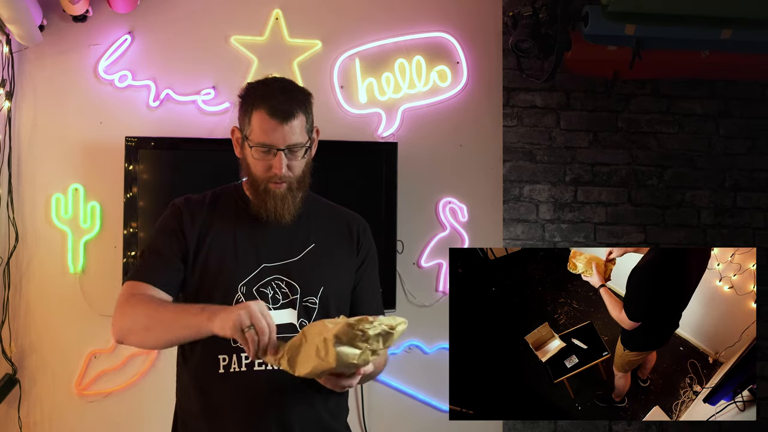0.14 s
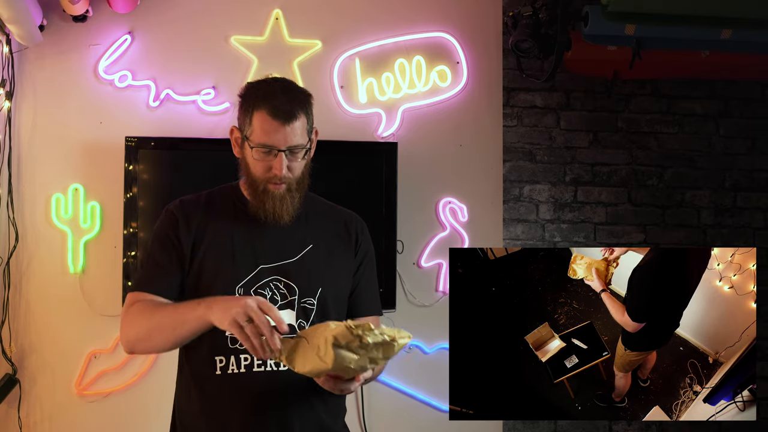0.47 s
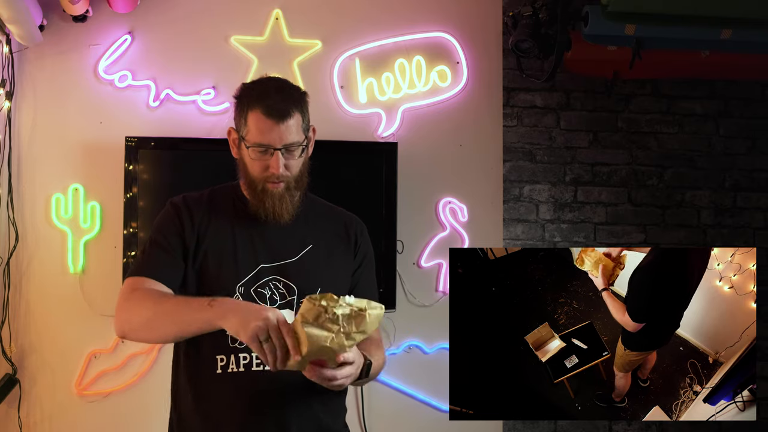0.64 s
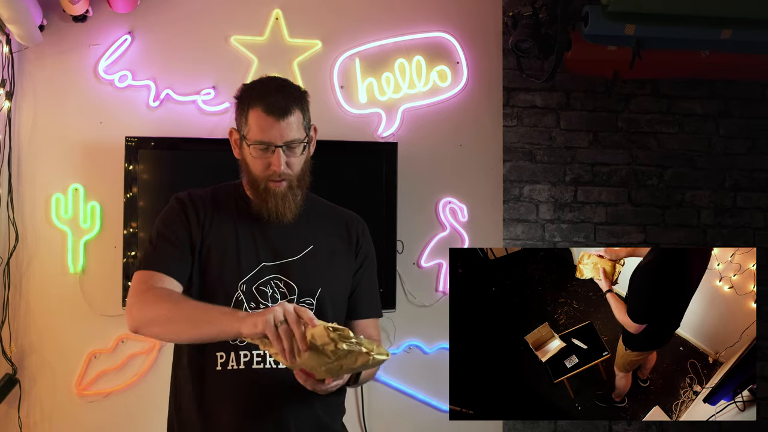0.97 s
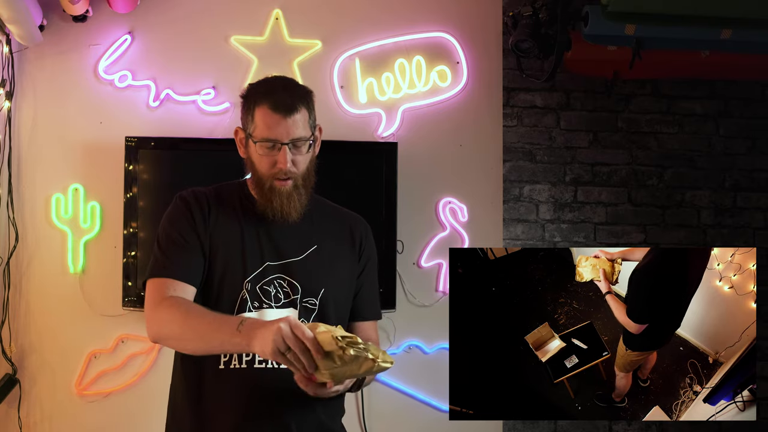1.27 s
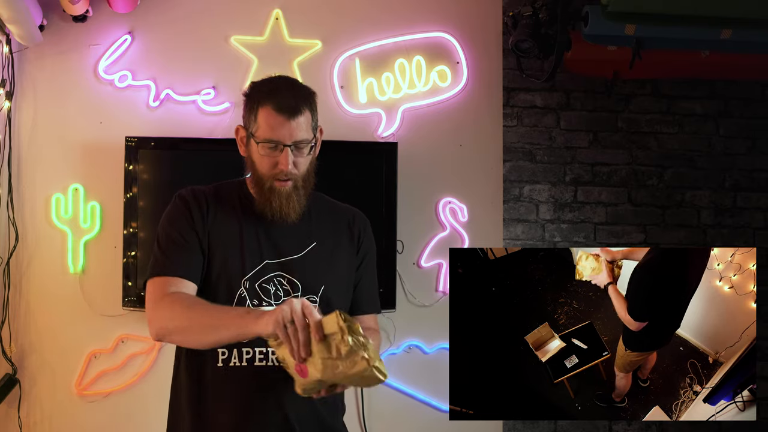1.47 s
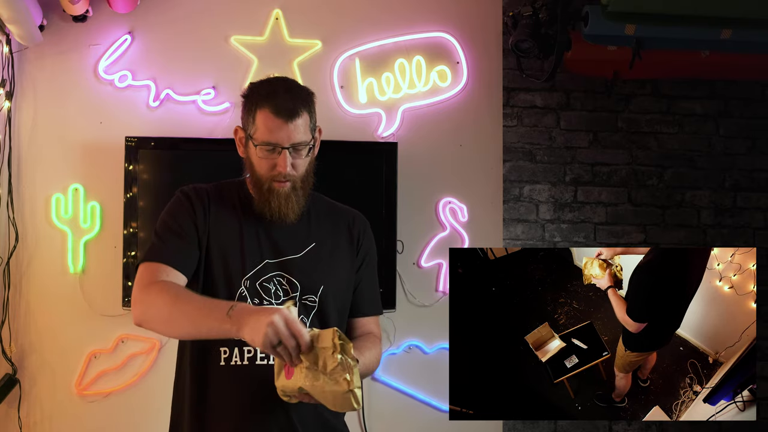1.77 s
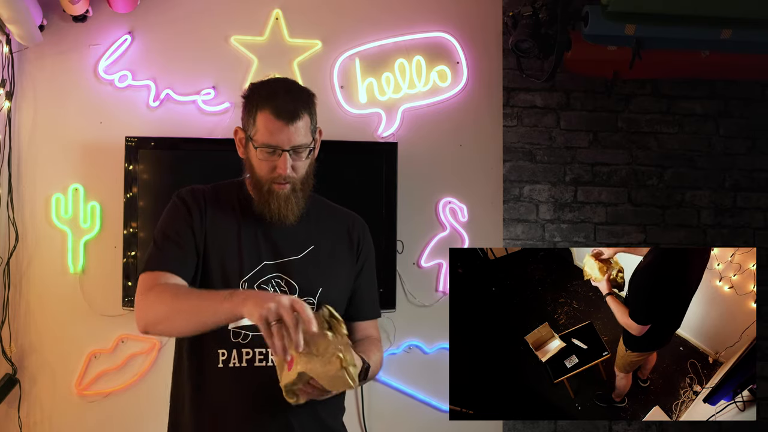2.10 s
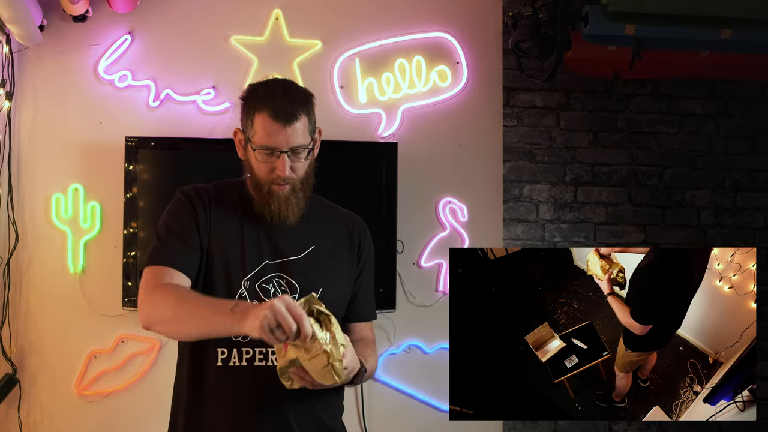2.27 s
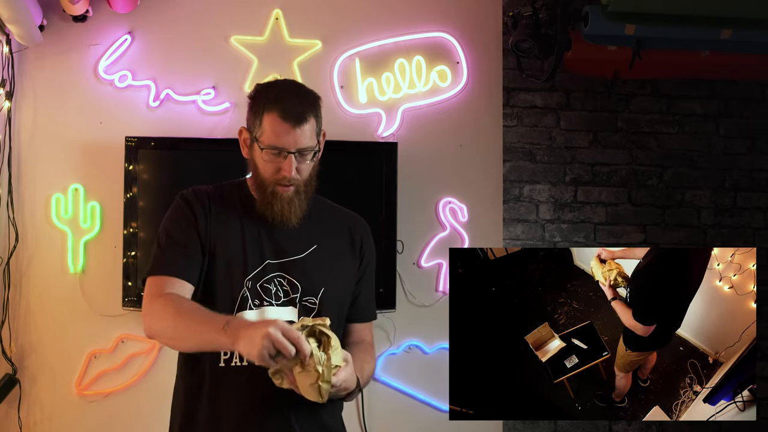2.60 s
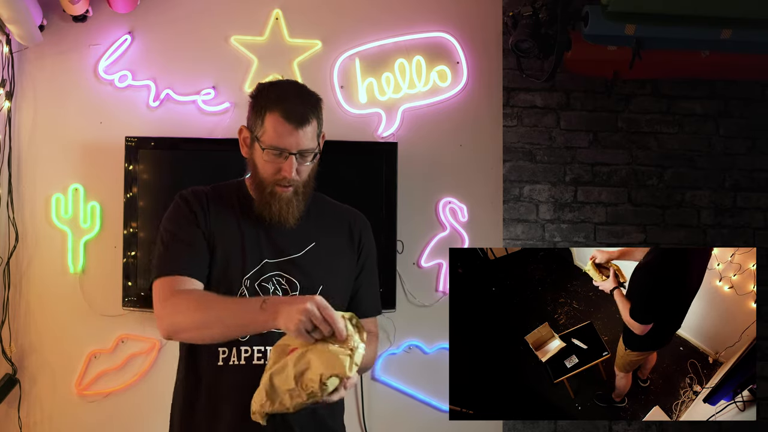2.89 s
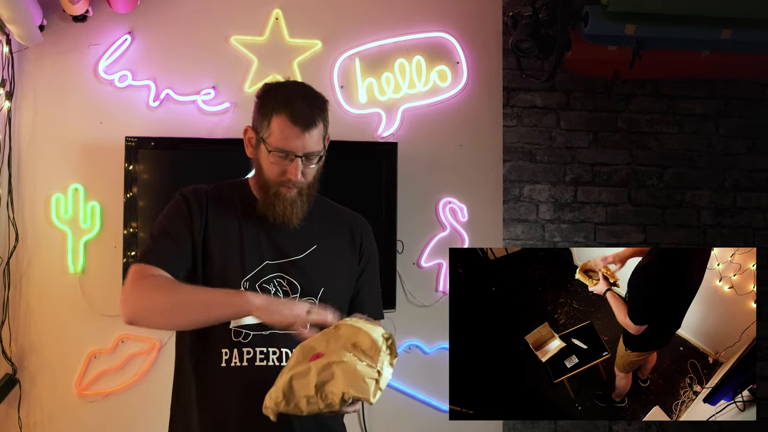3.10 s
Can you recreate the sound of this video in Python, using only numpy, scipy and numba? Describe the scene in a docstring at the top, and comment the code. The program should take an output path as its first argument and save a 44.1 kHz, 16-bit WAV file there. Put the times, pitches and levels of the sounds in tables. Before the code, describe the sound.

Stiff wrapping paper crumpled and pulled open by hand, sharp crackles and snaps in a small room

```python
"""Stiff wrapping paper is pulled open and crumpled by hand a metre from a microphone in a small room.
Crackle opens the scene; folds and snaps burst hard at about 0.25 s and keep coming until a lull near 1.3 s.
The loudest fold bursts at 1.7 s with a soft thump; folds go on to the end, the last ones further apart.
Every buckling crease is a short damped sine, large facets low and small creases high; folds are dense
clusters of them, snaps are brief noise, and rumble and faint hiss lie beneath. The peaks overload."""
import sys
import numpy as np
from scipy import signal
from scipy.fft import rfft, irfft
from scipy.io import wavfile
from scipy.ndimage import uniform_filter1d, map_coordinates
from numba import njit

SR = 44100
rng = np.random.default_rng(int(sys.argv[2]) if len(sys.argv) > 2 else 0)


def dump(signal):
    """Clip the signal to [-1, 1] and save it as 16-bit WAV at the path in sys.argv[1]."""
    limited = np.clip(np.atleast_2d(signal).T, -1, 1)
    pcm = np.round(limited * 32767).astype(np.int16)
    wavfile.write(sys.argv[1], SR, pcm)


def level_to_linear(level):
    """Convert decibel levels to linear amplitude factors, elementwise."""
    exponent = np.asarray(level, float) / 20
    return 10 ** exponent


N = 143325  # samples, 3.25 s


def unit(x):
    """Scale to rms 1."""
    return x / np.sqrt(np.mean(x ** 2))


def over_hz(table, hz):
    """Read a table of (Hz, value) along log frequency."""
    table = np.array(table, float)
    return np.interp(np.log(np.maximum(hz, 1)), np.log(table[:, 0]), table[:, 1])


def band(x, lo_hz, hi_hz):
    """Band-pass with gentle edges."""
    return signal.sosfilt(signal.butter(2, [lo_hz, hi_hz], "bandpass", fs=SR, output="sos"), x)


def walk(rate):
    """Random levels, each held for 1 / rate seconds, with the steps smoothed into slopes."""
    hold = int(SR / rate)
    held = rng.standard_normal(N // 50)[np.arange(N) // hold]
    return uniform_filter1d(held, hold // 2)


@njit
def rings(n, start, pole, size, length):
    """Adds up short damped sines, each a rotating and shrinking complex number."""
    y = np.zeros(n)
    for g in range(len(start)):
        z = size[g] + 0j
        for i in range(start[g], min(n, start[g] + length[g])):
            y[i] += z.imag
            z *= pole[g]
    return y


def damped_sines(start_s, hz, cycles, size):
    """Struck resonances: each amplitude falls by a factor e in half the given number of cycles."""
    tau = cycles / 2 / hz * SR  # samples
    pole = np.exp(2j * np.pi * hz / SR - 1 / tau)
    return rings(N, (start_s * SR).astype(np.int64), pole, size, (6 * tau).astype(np.int64))


def background():
    """Low rumble that comes and goes, and faint steady hiss, both filtered noise."""
    # Rumble under the paper: start_s [s], level_db [dB rms]
    rumble_levels = [(0.0, -63), (0.44, -70), (0.5, -51), (0.78, -63), (1.28, -70), (1.55, -62), (2.6, -70),
                     (3.1, -56)]
    time_s, level_db = np.array(rumble_levels).T
    rumble = unit(band(band(rng.standard_normal(N), 6, 77), 6.9, 97))
    rumble = rumble * level_to_linear(np.interp(np.arange(N) / SR, time_s, level_db))
    hiss = unit(band(rng.standard_normal(N), 100, 4500))
    return rumble + level_to_linear(-52.5) * hiss


def room(x):
    """Diffuse echo that dies fastest near 1 kHz; its fine pattern changes as the parcel moves."""
    # Decay of the small room: pitch_hz [Hz], t60_s [s]
    room_decay = [(200, 0.34), (1000, 0.17), (4000, 0.26), (12000, 0.43)]
    echo_db, gap_s = -8, 0.0047  # echo energy against the direct sound; silence ahead of the echo
    places = 8  # positions of the parcel, each with its own echo pattern
    t = np.arange(SR // 2) / SR
    onset = np.clip(t / gap_s - 1, 0, 1)
    wet = 0
    for place in range(places):
        echo = 0
        for hz in 125 * 2. ** np.arange(7):  # octave bands
            t60 = over_hz(room_decay, hz)
            tail = band(rng.standard_normal(len(t)), hz / np.sqrt(2), hz * np.sqrt(2))
            echo = echo + tail * level_to_linear(-60 * t / t60) * onset / np.sqrt(t60)
        echo = echo / np.sqrt(np.sum(echo ** 2))
        # each place fades into the next at constant power
        distance = np.abs(np.arange(N) / N * (places - 1) - place)
        share = np.sqrt(np.clip(1 - distance, 0, 1))
        wet = wet + signal.fftconvolve(x * share, echo)[:N]
    return x + level_to_linear(echo_db) * wet


def thumps():
    """Low damped swings when the parcel is pushed in."""
    # Soft thumps of the whole parcel: start_s [s], level_db [dB at onset, before the band-pass], pitch_hz [Hz]
    thump_events = [(1.697, -22, 168), (1.89, -28, 159), (2.216, -28, 187), (2.469, -21.5, 169),
                    (2.511, -30, 197), (2.809, -27.5, 210)]
    start_s, level_db, hz = np.array(thump_events).T
    return band(damped_sines(start_s, hz, 6.2, level_to_linear(level_db)), 76, 450)


def snaps():
    """Single sharp creases: a few ms of noise around one pitch, with a broad bright edge."""
    # Crisp snaps: start_s [s], level_db [dB rms before decay, 10 dB above what is used], centre_hz [Hz]
    snap_events = [(0.158, -20, 2870), (0.2493, 8, 3630), (0.261, 0, 4270), (0.276, 5, 2550),
                   (0.288, 10, 1440), (0.303, -6, 2430), (0.608, -10, 900), (0.6817, -4.5, 2620),
                   (0.7263, -10, 3550), (0.7922, -10, 3600), (0.857, -11, 2850), (0.9528, -7.5, 3580),
                   (0.986, -6, 1700), (1.008, -3.5, 630), (1.0597, 0, 3700), (1.06, 1.5, 610),
                   (1.1141, 0.5, 1560), (1.213, -0.5, 607), (1.2121, 0.5, 1780), (1.236, 7.5, 4470),
                   (1.2375, -2.5, 900), (1.264, 0, 1940), (1.385, -7, 2780), (1.563, -6, 2670),
                   (1.6934, -16, 2620), (1.8164, -1, 2870), (1.8264, -7, 2620), (1.8367, -8, 2600),
                   (1.851, 4, 2930), (1.87, -4, 3180), (1.95, -6, 3240), (2.111, -17, 1090),
                   (2.2256, -4.5, 2500), (2.2364, 1.5, 2340), (2.3135, -9, 2900), (2.328, -13, 9000),
                   (2.384, -21, 7300), (2.491, -19, 10500), (2.503, -20, 10500), (2.525, -7, 1770),
                   (2.579, -13, 4400), (2.642, -23, 8850), (2.714, -12, 1550), (2.807, -4.5, 2580),
                   (2.839, -10, 3570), (2.9049, -1, 3400), (2.975, -10, 3220), (3.047, -19.5, 10500),
                   (3.2394, -6, 3140)]
    trim_db, t60_s, edge_db = -10, 0.023, -8.5
    spread = 1.43  # the band runs from centre / spread to centre * spread
    out = np.zeros(N + 2048)
    age = np.arange(2048) / SR
    jolt = 1.54 * (age < 2 / SR)  # a first kick over the crackle
    for (start_s, level_db, hz), noise in zip(snap_events, rng.standard_normal((80, 2048))):
        noise = noise + jolt
        crackle = unit(band(noise, hz / spread, min(hz * spread, 18000)))
        edge = band(band(noise, 2200, 11700), 1500, 13600)
        edge = edge * min(hz / 3040, 1) ** 2  # duller snaps have less edge
        snap = crackle + level_to_linear(edge_db) * edge
        i = int(start_s * SR)
        out[i:i + len(age)] += snap * level_to_linear(level_db + trim_db - 60 * age / t60_s)
    return out[:N]


def hollow(x):
    """The parcel's air and folds favour a few pitches: resonators run alongside the direct sound."""
    # Resonances of the parcel: pitch_hz [Hz], width_hz [Hz], level_db [dB, before the common trim below]
    resonances = [(567, 79, 4.5), (1745, 41, 8.5)]
    ringing = sum(level_to_linear(db) * signal.lfilter(*signal.iirpeak(hz, hz / width_hz, fs=SR), x)
                  for hz, width_hz, db in resonances)
    return x + level_to_linear(-12.5) * ringing


def paper_colour(x):
    """Causal minimum-phase filter with the tone of the paper, built from its log gain."""
    # Tone of the paper: pitch_hz [Hz], gain_db [dB]
    paper_tone = [(65, -73), (110, -22), (160, -16.5), (262, -1), (323, -8), (601, -1), (666, -1), (987, 0),
                  (1140, -3.5), (1690, 0), (2170, -2), (2560, 0.5), (5600, -10), (7500, -18), (15500, -25)]
    log_gain = over_hz(paper_tone, np.linspace(0, SR / 2, 1025)) * np.log(10) / 20
    cepstrum = irfft(log_gain)
    # folding the cepstrum onto positive time makes the filter causal
    cepstrum[1:1024] *= 2
    cepstrum[1025:] = 0
    return signal.fftconvolve(x, irfft(np.exp(rfft(cepstrum))))[:N]


def creases(lo_hz, hi_hz, per_s, cycles, scatter_db):
    """A stream of buckling creases, damped sines of random pitch and heavy-tailed size; rms 1."""
    biggest_db = 10.5  # ceiling of the size scatter
    patch_db, patch_s, patch_oct = 3.5, 0.025, 0.593
    when, pitch, rarity, sign = rng.random((150000, 4))[:int(per_s * N / SR)].T
    start_s = when * N / SR
    hz = lo_hz * (hi_hz / lo_hz) ** pitch
    scatter = np.minimum(-scatter_db * np.log(1 - rarity), biggest_db)
    size = hz * level_to_linear(scatter) * np.sign(sign - 0.5)
    # the colour shifts in patches of time and pitch as other facets take the strain
    patch = map_coordinates(rng.standard_normal((400, 12)),
                            [start_s / patch_s, np.log2(hz / lo_hz) / patch_oct],
                            order=1, mode="mirror")
    size = size * level_to_linear(patch_db * patch)
    y = damped_sines(start_s, hz, cycles, size)
    return unit(band(paper_colour(y), lo_hz, hi_hz))


def fold_power(start_s, level_db, t60_s):
    """Power envelope of sudden folds, each starting within about 1 ms and dying away."""
    t = np.arange(N) / SR
    power = np.zeros(N)
    for start, db, t60 in zip(start_s, level_db, t60_s):
        i = int(start * SR)
        age = t[:min(N - i, int(t60 * SR))]
        attack = 1 - np.exp(-age / 0.001)
        power[i:i + len(age)] += (level_to_linear(db - 60 * age / t60) * attack) ** 2
    return power


def paper():
    """Steady crumpling, plus folds that each release a cluster of creases, plus lone tiny ticks."""
    # Creases, large facets to fine: lowest_hz [Hz], highest_hz [Hz], rate [per s, while crumpling],
    # cycles [twice the cycles to fall by e], scatter_db [dB, mean before the ceiling, while crumpling]
    crease_sizes = [(110.4, 920, 1300, 3.35, 2.5), (758, 4560, 7000, 2.67, 4.5),
                    (3700, 20000, 15000, 0.88, 0.5)]
    # Crumpling by hand: start_s [s], middle_db [dB], large_db and fine_db [dB above middle]
    crumpling = [(0.0, -30.5, -14.5, -2), (0.08, -43, -0.5, -9), (0.1, -35.5, -18, -6),
                 (0.182, -22, -9.5, -10), (0.232, -28, -10, -5), (0.26, -12.5, -11, -4.5),
                 (0.304, -7, -6.5, -7), (0.33, -16.5, -7.5, -16), (0.44, -36.5, -12.5, -20),
                 (0.48, -33.5, -12, -2.5), (0.56, -48.5, -10.5, -2.5), (0.61, -29.5, 3.5, -7.5),
                 (0.67, -32.5, -8.5, -3), (0.689, -19.5, -9.5, -10), (0.71, -26.5, -11, -16),
                 (0.78, -32, -15, -4.5), (0.799, -18.5, -13.5, -14), (0.9, -30, -8, -3.5),
                 (0.97, -26.5, -11.5, -14), (1.02, -22, -6, -9.5), (1.06, -24, -7, -7), (1.09, -34, -9, -6),
                 (1.12, -24, -5, -11), (1.14, -28.5, -1, -7.5), (1.201, -31, -4, -7),
                 (1.211, -21, -7.5, -7), (1.27, -24.5, -8.5, -1), (1.539, -42, -3.5, -12.5),
                 (1.568, -15.5, -5.5, -12), (1.6, -26, -0.5, -8), (1.69, -24, -7.5, -7),
                 (1.701, -8, -5, 0.5), (1.709, -13.5, 2, -1), (1.81, -31.5, -5, -6.5),
                 (1.83, -16, -8.5, -4), (1.87, -18, -2.5, 0), (1.97, -17.5, -12, -10.5),
                 (2.05, -34.5, -0.5, -13), (2.07, -28.5, -0.5, -6.5), (2.222, -34.5, -9.5, -6),
                 (2.241, -19.5, -7.5, -7.5), (2.3, -25.5, -9.5, -4), (2.34, -19, -3.5, -13),
                 (2.44, -29, -10.5, -4), (2.48, -25.5, 3.5, -6), (2.59, -25.5, -6.5, -13),
                 (2.62, -31.5, -7, -9), (2.7, -34.5, -10, -7), (2.71, -28.5, 1, -11),
                 (2.74, -24.5, -7.5, -5.5), (3.04, -30, -6.5, -7), (3.13, -44, -1, -8),
                 (3.25, -28, -5.5, -11)]
    # Sudden folds: start_s [s], middle_db, large_db, fine_db [dB before the common trim],
    # t60_s [s, before the factor for each crease size]
    folds = [(0.099, -7.5, -48, -39, 0.049), (0.118, -16.5, -23, -13.5, 0.052),
             (0.177, -24, -44, -8, 0.046), (0.249, -1, -6.5, -11, 0.033), (0.469, -25, -45, -5, 0.036),
             (0.587, -12.5, -22, -17, 0.054), (0.61, -14, -42, -20, 0.033),
             (0.639, -11.5, -46, -11.5, 0.07), (0.682, -8, -35, -10, 0.041), (0.794, -11, -39, -16, 0.098),
             (0.856, -6, -18, -8.5, 0.066), (0.922, -8, -43, -13, 0.038), (0.951, -6.5, -27, -21, 0.041),
             (0.984, -8, -32, -23, 0.04), (1.008, -12, -14, -33, 0.063), (1.058, -3.5, -44, -28, 0.03),
             (1.116, -7, -42, -19, 0.035), (1.212, 0, -13, 2, 0.029), (1.235, 2, -6, 10.5, 0.019),
             (1.265, -15, -37, -8, 0.017), (1.489, -22.5, -43, -29, 0.046), (1.56, -4.5, -22, -8, 0.071),
             (1.634, -7, -38, -11, 0.06), (1.695, 10.5, 2, 6.5, 0.032), (1.817, -9, -29, -4, 0.04),
             (1.829, -22, -25, -25, 0.037), (1.849, -15, -40, -2, 0.029), (1.951, -16, -14.5, -7.5, 0.15),
             (2.067, -27, -16, -20, 0.043), (2.111, -10, -35, -20, 0.056), (2.225, 0.5, -27, -30, 0.019),
             (2.232, -4, -28, -14, 0.019), (2.331, 1.5, -5.5, -17, 0.05), (2.469, -8, -6, -24, 0.054),
             (2.505, -8, -12, -18, 0.023), (2.552, -2.5, -22, -28, 0.036), (2.713, -23, -10, -37, 0.029),
             (2.745, -10, -39, -19, 0.13), (2.908, -8, -40, -11, 0.046), (2.972, -8.5, -52, -31, 0.077),
             (3.152, -24.5, -36, -26, 0.17), (3.229, -6.5, -37, -12, 0.059)]
    fold_trim_db, fold_density = -7, 2.2  # folds hold more creases per second than crumpling
    fold_length = (0.78, 0.62, 0.47)  # decay factor for large, middle and fine creases
    tick_db = -27  # against the middle creases

    time_s, middle, large, fine = np.array(crumpling).T
    crumple_levels = (middle + large, middle, middle + fine)
    fold_s, fold_middle, fold_large, fold_fine, fold_t60 = np.array(folds).T
    fold_levels = (fold_large, fold_middle, fold_fine)
    fold_t60 = np.maximum(fold_t60, 0.004)

    t = np.arange(N) / SR
    flicker_db = walk(84)  # the crumpling flickers slightly, 84 new levels per s
    out = 0
    for sizes, crumple_db, fold_db, length in zip(crease_sizes, crumple_levels, fold_levels, fold_length):
        lo_hz, hi_hz, per_s, cycles, scatter_db = sizes
        crumple = creases(lo_hz, hi_hz, per_s, cycles, scatter_db)
        out = out + crumple * level_to_linear(np.interp(t, time_s, crumple_db) + flicker_db)
        power = fold_power(fold_s, fold_db + fold_trim_db, fold_t60 * length)
        cluster = creases(lo_hz, hi_hz, per_s * fold_density, cycles, scatter_db / 2)
        out = out + cluster * np.sqrt(power)
    ticks = creases(7000, 17000, per_s=160, cycles=5, scatter_db=6)
    out = out + ticks * level_to_linear(tick_db + np.interp(t, time_s, middle))
    return signal.sosfilt(signal.butter(4, 81, "highpass", fs=SR, output="sos"), out)


def scene():
    """Paper, snaps and thumps in their room over the background; one channel."""
    parcel = hollow(paper()) + snaps() + thumps()
    return (room(parcel) + background())[None]


def low_pass(x):
    """Removes everything above the highest recorded frequency."""
    return signal.sosfilt(signal.butter(12, 15640, fs=SR, output="sos"), x)


def record(dry):
    """The converter clips at full scale when the paper is too loud for it."""
    clipped = np.clip(dry, -1, 1)
    return low_pass(clipped)


dry = scene()
out = record(dry)
dump(out)
```